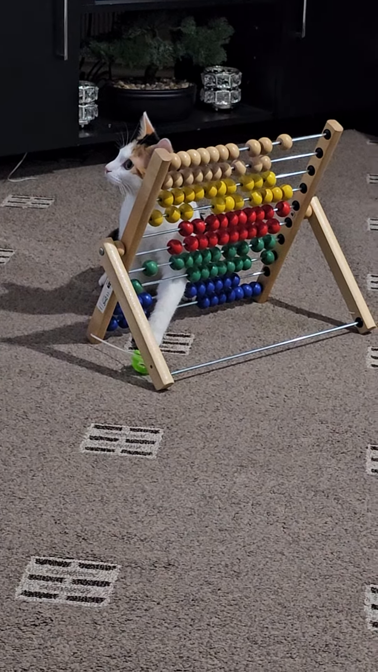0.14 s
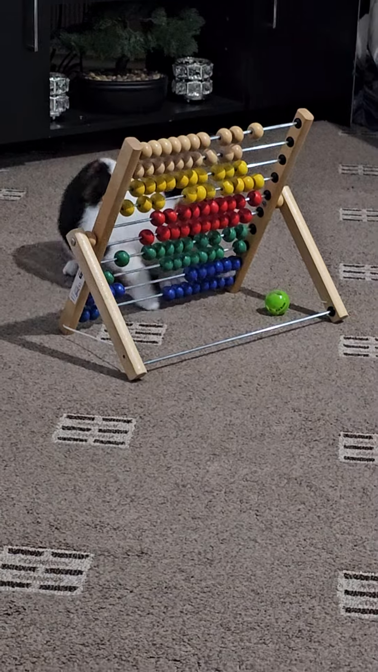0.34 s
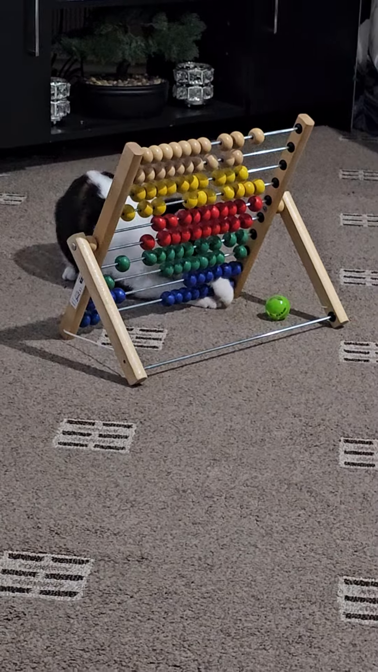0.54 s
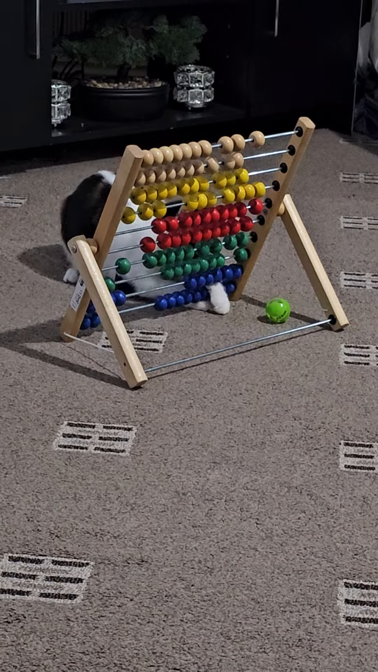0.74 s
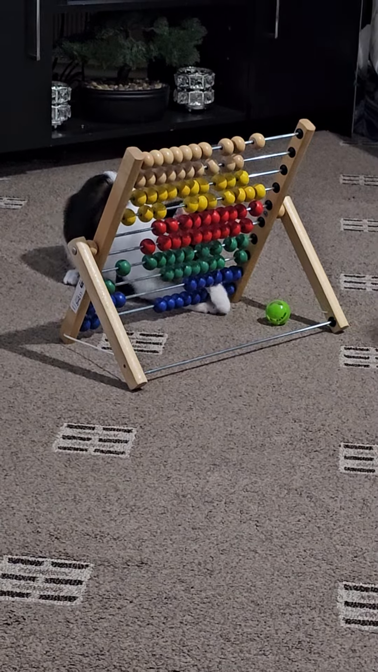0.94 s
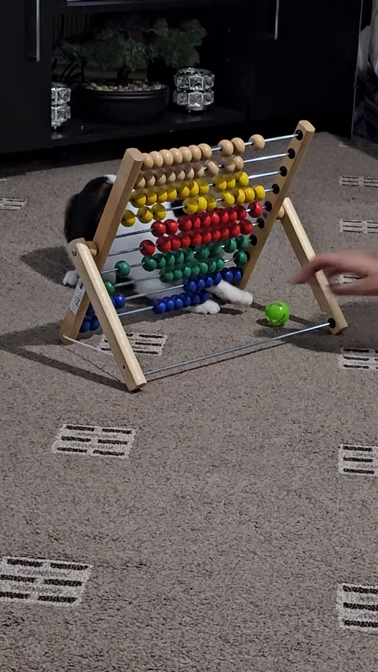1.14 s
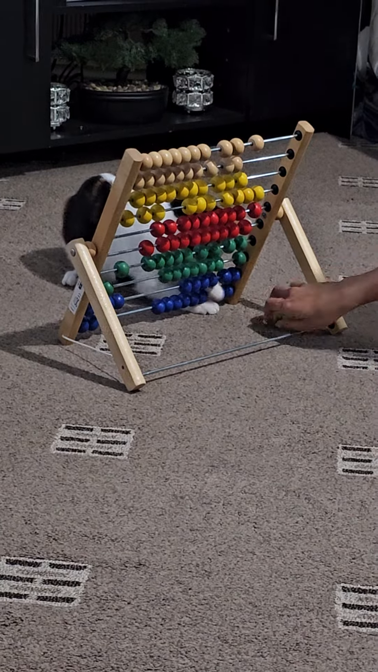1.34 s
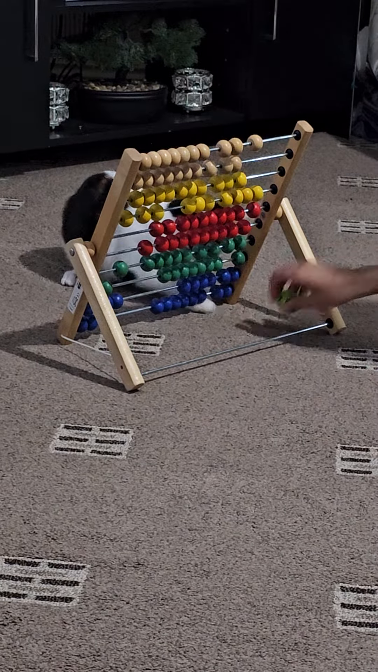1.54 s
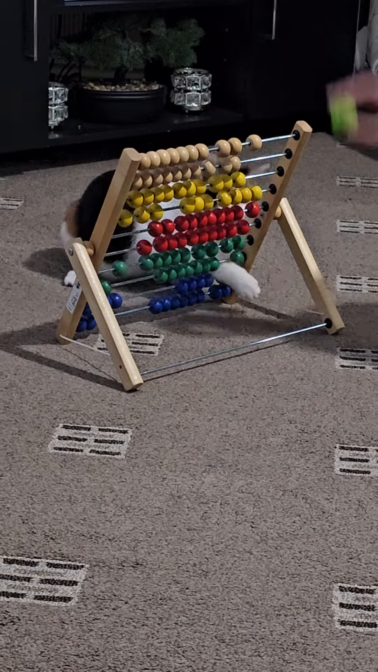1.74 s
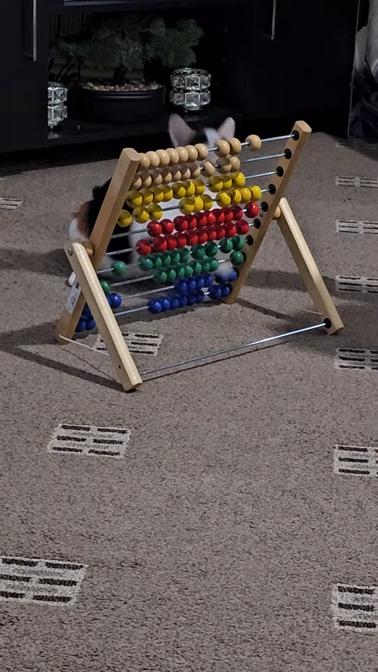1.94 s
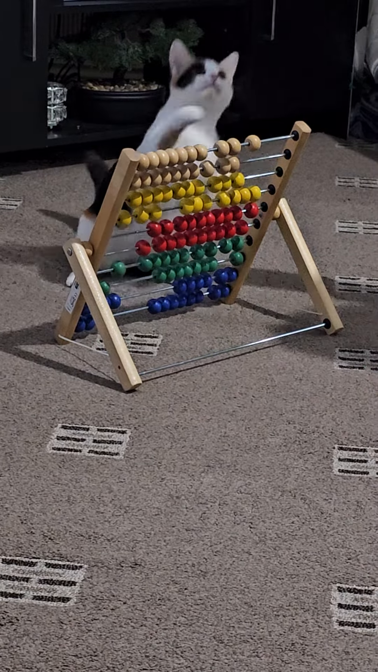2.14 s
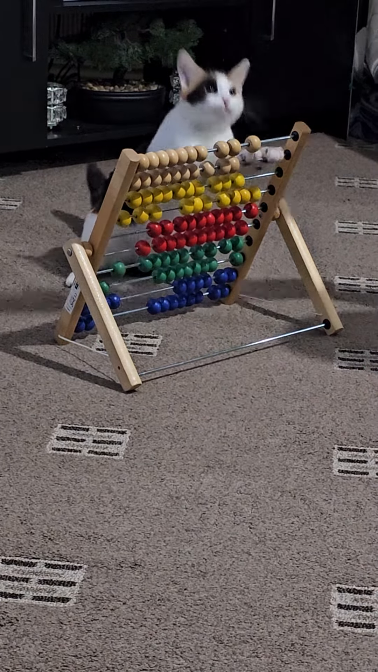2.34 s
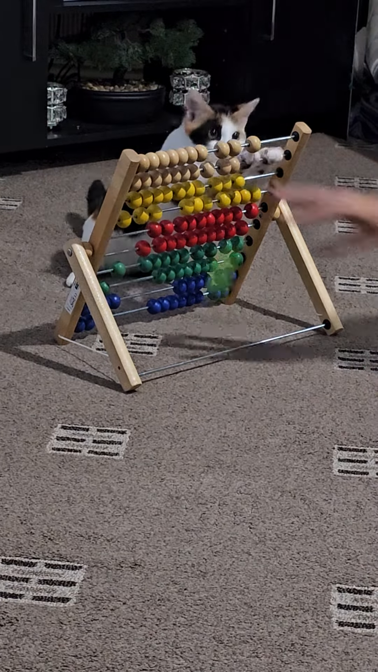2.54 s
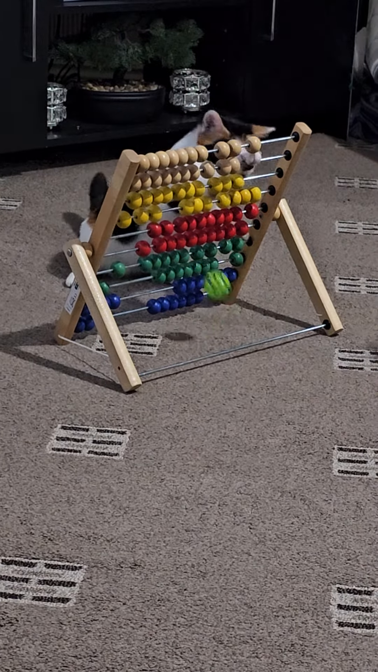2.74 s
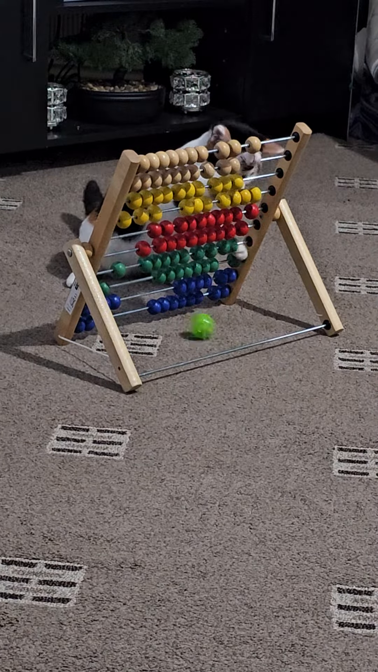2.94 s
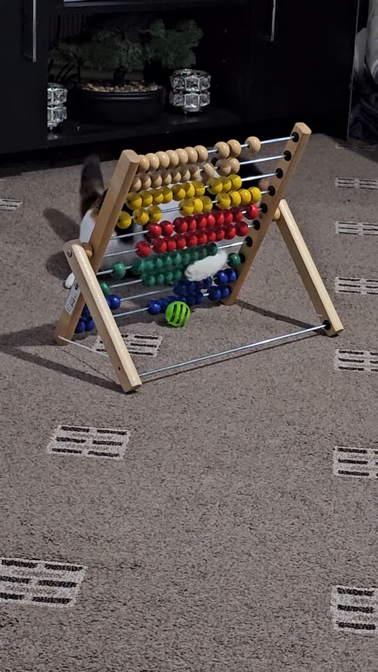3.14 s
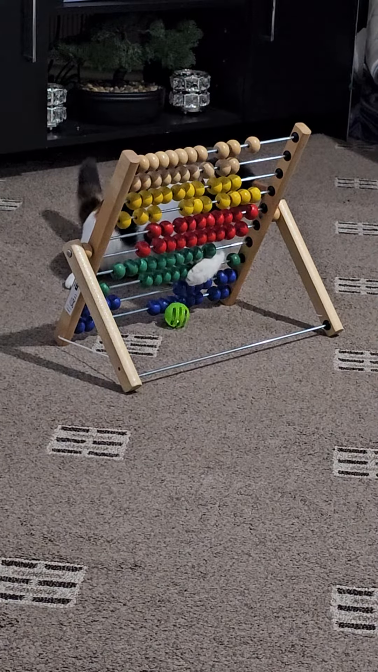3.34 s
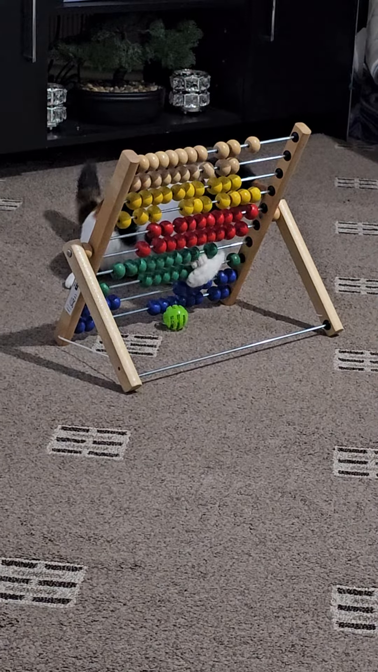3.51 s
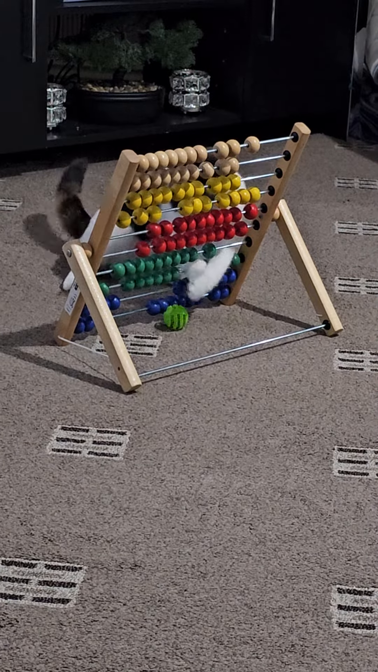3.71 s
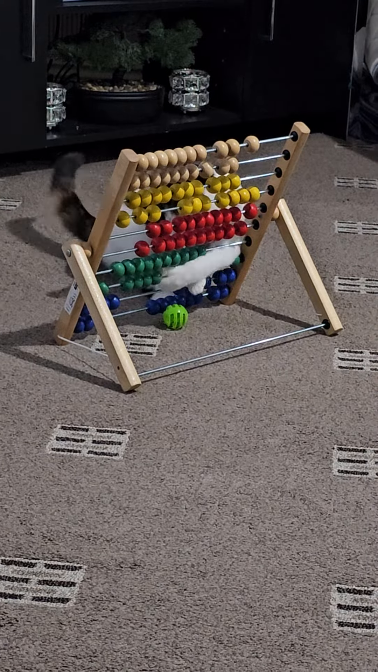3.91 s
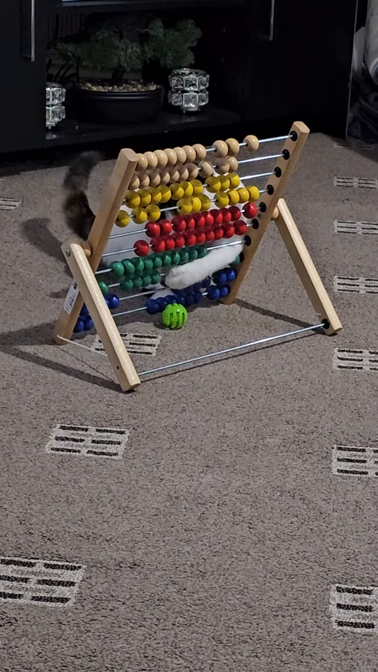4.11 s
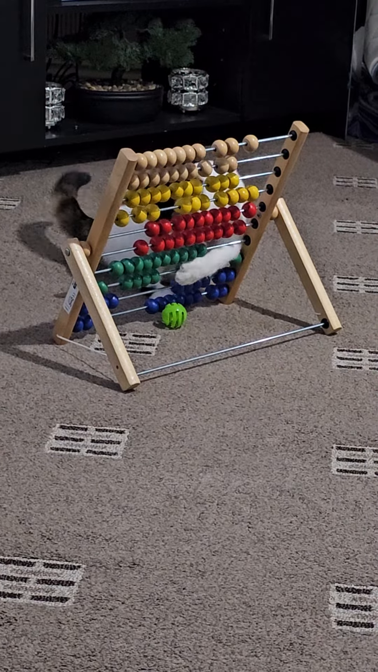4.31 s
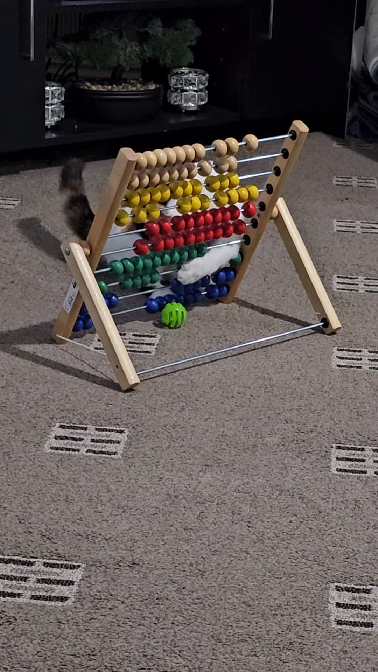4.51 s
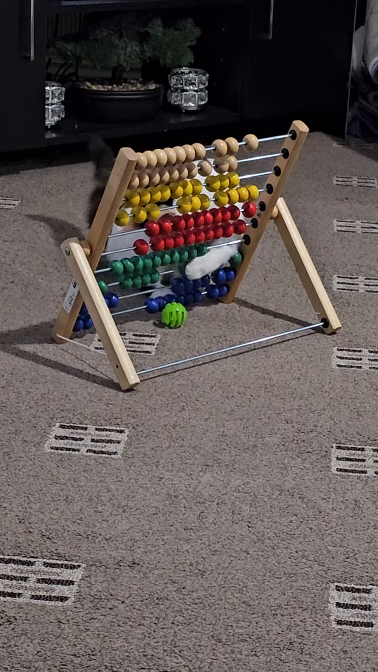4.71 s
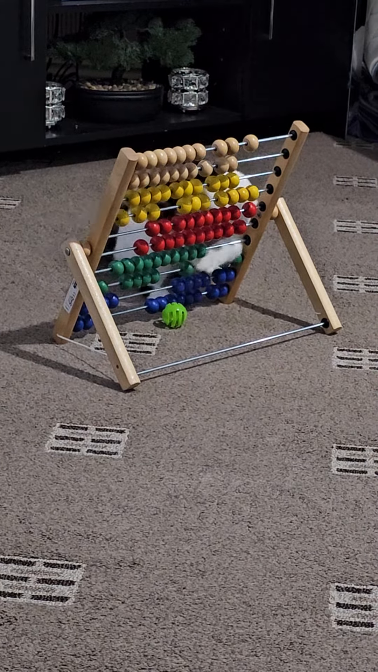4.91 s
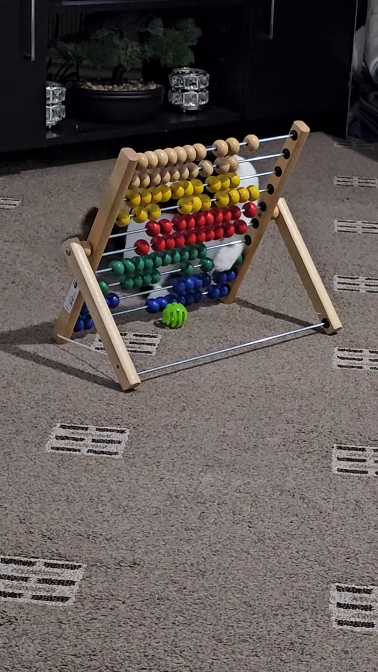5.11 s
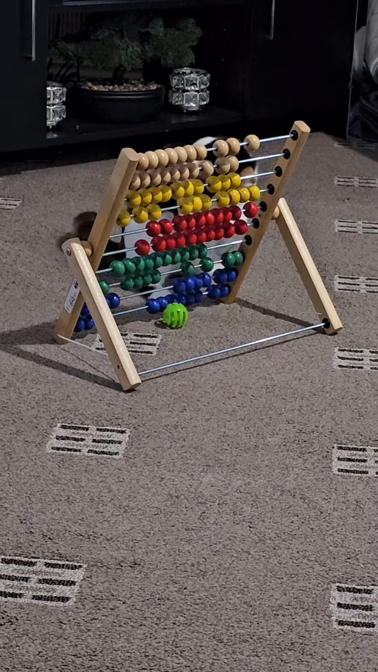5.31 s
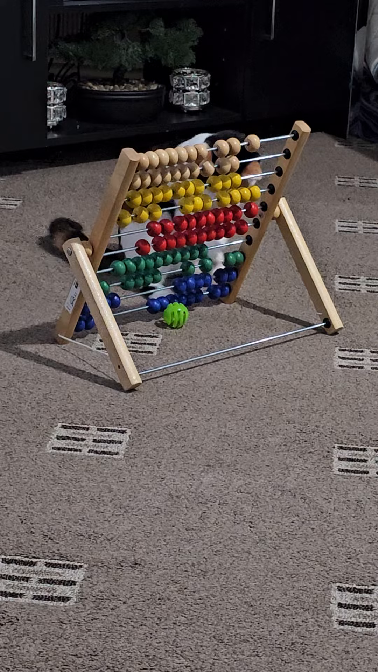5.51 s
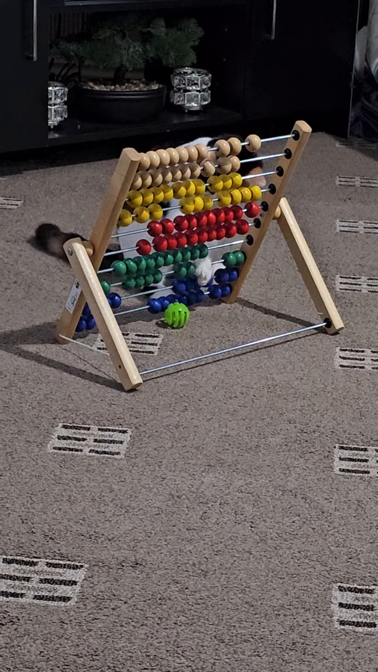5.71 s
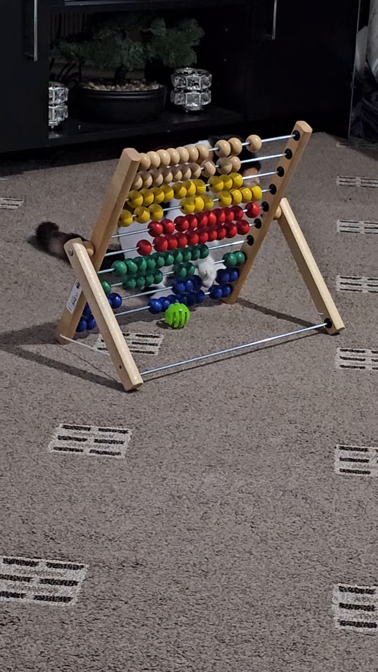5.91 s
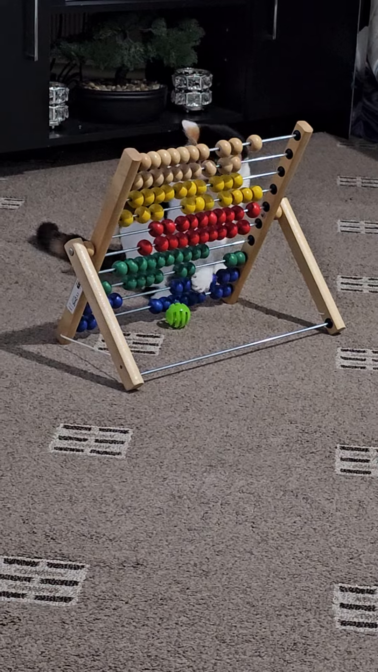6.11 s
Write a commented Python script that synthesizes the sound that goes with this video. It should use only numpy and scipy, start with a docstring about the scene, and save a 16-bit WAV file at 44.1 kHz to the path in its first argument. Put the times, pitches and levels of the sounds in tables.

```python
"""A wavering low hum and room hiss come first, with a faint airy whistle drifting on the left.
Then two kittens paw a wooden abacus on a carpet: beads clack and jostle along steel rods that ping,
and soft paws thump the frame and floor. A jingle ball is picked up, shaken and dropped, its pellet
rattling the thin shell. A phone hears it all from a metre or two away, with a short room tail."""
import sys
import numpy as np
from scipy import signal
from scipy.fft import rfft, irfft
from scipy.io import wavfile
from scipy.ndimage import uniform_filter1d

SR = 44100
rng = np.random.default_rng(int(sys.argv[2]) if len(sys.argv) > 2 else 0)


def persist_wave(psi):
    """Save psi, clipped to +-1, as 16-bit WAV."""
    counts = np.round(np.clip(psi, -1, 1) * 32767).astype(np.int16)
    wavfile.write(sys.argv[1], SR, np.atleast_2d(counts).T)


N = 271465
T = np.arange(N) / SR

# the hum's drifting pitch and swell: t/s, f/Hz, level between dips/dB
HUM_PATH = [(0, 47.9, -38), (.5, 48.1, -37.5), (.75, 50.2, -37), (.95, 50.1, -41.5), (1.25, 47.9, -34),
            (1.6, 45.93, -38), (1.85, 50.63, -37.5), (2.23, 49.34, -34), (2.7, 47.27, -38),
            (3.1, 46.1, -33), (3.3, 49.97, -39.5), (3.55, 48.28, -39.5), (4.1, 49.6, -34.5),
            (4.5, 48.44, -39), (4.85, 40.66, -48), (5.049, 49.92, -34.5), (5.701, 49.2, -36.5),
            (6.16, 43.3, -42.5)]
# brief dips in the hum: t/s, half width/s
HUM_DIPS = [(.34, 0.035), (.65, 0.045), (.72, 0.016), (.82, 0.035), (1.301, 0.094), (1.679, 0.054),
            (1.821, 0.057), (2.09, 0.097), (2.329, 0.087), (2.55, 0.14), (2.83, 0.091), (3.119, 0.073),
            (3.32, 0.045), (3.721, 0.013), (3.822, 0.034), (3.981, 0.071), (4.29, 0.091), (4.49, 0.022),
            (4.609, 0.035), (4.721, 0.029), (4.95, 0.073), (5.08, 0.084), (5.301, 0.092), (5.5, 0.045),
            (5.801, 0.085), (6.071, 0.054)]
# mains overtones: f/Hz, level/dB
MAINS_TONES = [(200, -66), (300, -75)]
# colour of the hiss: f/Hz, relative level/dB
HISS_SPECTRUM = [(15, -44), (28, -20.5), (40, -6.5), (53, -1), (65, -8.5), (97, -26), (200, -29),
                 (300, -33), (340, -40), (530, -44.5), (1020, -44.5), (1800, -54), (3000, -59), (5000, -63),
                 (8500, -73.5), (10300, -75), (11300, -62.5), (16000, -70.5)]
# slow swell of the hiss: t/s, mid-range level/dB, lower-treble lift/dB
HISS_PATH = [(0.0, -66.5, -4), (0.31, -66, -4), (0.68, -61.5, -1.5), (1.18, -65, 2.5), (1.66, -64.5, 1),
             (2.11, -64.5, 4), (2.73, -63, -3), (3.12, -57.5, -6), (3.32, -61, -3), (3.8, -62, 2.5),
             (4.759, -67, 1), (6.16, -69, 1)]
# the whistle's glide: t/s, f/Hz, level/dB
WHISTLE_PATH = [(0, 3458, -81), (0.081, 3320, -89), (0.16, 2940, -89), (.24, 2920, -84), (.33, 3470, -76),
                (.46, 3260, -74), (0.849, 3330, -78), (0.921, 2880, -87), (1.049, 3060, -75),
                (1.298, 3460, -76), (1.5, 3400, -100)]
# bead hits: t/s, peak before panning/dB, ring f/Hz, tick against wood/dB,
# jostle against peak/dB, jostle length/s
BEAD_CLACKS = [(0.328, -54, 3220, -4, -36, .044), (0.4817, -33.5, 4100, -37, -7.5, 0.02),
               (0.4945, -33, 4600, -43, -10, 0.039), (0.507, -47.5, 4370, -6, -5, 0.056),
               (0.5556, -35.5, 4500, -39, -16, 0.042), (0.658, -46, 4600, -35, -20.5, 0.17),
               (1.072, -41, 4600, -15, -7, .023), (1.096, -46.5, 4550, -26, -9, 0.047),
               (1.14, -45, 4420, -7.5, -16.5, 0.06), (1.382, -49.5, 5270, -1.5, -14, 0.087),
               (1.405, -46, 4470, -22, -18, 0.14), (1.496, -38.5, 4720, -33, -23.5, .045),
               (1.649, -48.5, 4600, 1, -13, 0.079), (1.713, -49, 4570, -17, -10.5, .081),
               (1.737, -30.5, 5500, -3, -10.5, .017), (1.751, -42.5, 4728, -16, -9, 0.11),
               (1.799, -37.5, 4890, -18, -5.5, 0.02), (1.824, -44, 4680, -15, -17, 0.057),
               (1.8843, -43, 4700, -32, -17, 0.11), (2.0427, -52.5, 3408, -22, -7.5, 0.026),
               (2.082, -52, 5230, 16, -14, 0.074), (2.146, -35, 4800, 9.5, -20.5, 0.071),
               (2.459, -41.5, 4170, -15, -15, 0.058), (2.4903, -36.5, 5430, 10.5, -19.5, .1),
               (2.5355, -36, 4340, 0, -21.5, 0.078), (2.603, -39, 4665, -4, -25, 0.031),
               (2.684, -22, 4250, 9.5, -10, 0.011), (2.6926, -21.5, 4000, -5.5, -22, 0.0095),
               (2.71, -37, 5130, -0.5, -12.5, 0.1), (2.737, -37, 4730, -5, -2, 0.019),
               (2.7465, -24.5, 3660, -29, -19, 0.057), (2.768, -34, 3640, -25, -12.5, 0.051),
               (2.88, -36.5, 4500, -11.5, -23.5, 0.074), (2.9234, -37, 4380, 4.5, -2, 0.032),
               (2.9304, -24, 5740, 10.5, -26.5, 0.14), (3.0548, -40, 5184, 2.5, -5.5, 0.036),
               (3.0721, -19, 4540, 3.5, -17, 0.062), (3.088, -20, 5560, 5.5, -17.5, 0.042),
               (3.111, -22.5, 4720, 14.5, -10, 0.019), (3.115, -27.5, 4750, 1.5, -15.5, 0.077),
               (3.1724, -35.5, 4850, -27, -8.5, 0.075), (3.198, -38.5, 4560, -29, -9, 0.055),
               (3.242, -44, 4580, -27, -8.5, 0.081), (3.612, -52.5, 3600, 3, -14, .046),
               (3.6446, -46, 4940, -18.5, -14, 0.058), (3.679, -50.5, 4830, -21, -8, 0.06),
               (3.7172, -53.5, 4460, -3, -9.5, 0.3), (3.845, -32.5, 4240, -26.5, -13, 0.061),
               (3.881, -42, 4733, -3.5, -11.5, 0.053), (3.9427, -47, 4063, -34, -10, 0.071),
               (4.0286, -47, 5700, -16, -17, .019), (4.0363, -45.5, 5500, -12, -17, 0.058),
               (4.394, -57.5, 4170, -11.5, -14, 0.063), (4.968, -45.5, 5060, -26, -14.5, 0.064),
               (5.621, -54, 4100, -21.5, -3.5, 0.017), (5.6397, -40, 4130, -33, -15.5, .042),
               (5.672, -26.5, 5565, -1, -21, 0.056), (5.695, -49, 4240, -10, -12, 0.037),
               (5.7153, -38, 4930, -13.5, -16.5, 0.021), (5.722, -46.5, 5634, -26, -18, 0.067),
               (6.0292, -59, 4600, -18, -8, 0.057)]
# resonances of a wooden bead: f/Hz, relative level/dB, t60/s
BEAD_MODES = [(2700, -5, 0.0036), (3450, -2.5, 0.016), (4320, 0, 0.016), (4880, -3.5, 0.013),
              (5870, -15.5, 0.008), (7160, -13, 0.012)]
# paws landing: t/s, peak before panning/dB, floor against frame/dB, left minus right/dB,
# contact time/s, top of the push/Hz, factor on the frame's ring time
PAW_THUMPS = [(0.716, -28, -6, -2.5, 0.013, 446, 0.29), (.741, -32.5, 2.5, 0, 0.025, 347, 0.42),
              (2.683, -14.5, -5, 1.5, 0.024, 1780, 0.52), (2.931, -35.5, 0.5, -2.5, 0.029, 1400, 0.83),
              (4.998, -30.5, 7, -2.5, 0.013, 250, 0.52), (5.717, -30.5, -33, -5.5, 0.0059, 260, 0.18)]
# resonances of the abacus frame: f/Hz, relative level/dB, undamped t60/s
FRAME_MODES = [(245, 3.5, 0.26), (292.6, 6, 0.14), (361, -6, 0.29), (417, -8.5, 0.25), (474, -12, 0.22),
               (521.6, -14.5, 0.48), (572, -25, .15), (690, -26, 0.14), (885, -24, 0.53), (969, -26, 0.36),
               (1060, -23.5, .25), (1380, -19.5, .12), (1540, -29, 0.094)]
# resonances of the floor: f/Hz, relative level/dB, t60/s
FLOOR_MODES = [(45, 7.5, 0.38), (83.3, -0.5, 0.2), (128.5, 8, 0.14), (174.7, -0.5, 0.17)]
# knocks on a steel rod: t/s, peak before panning/dB
ROD_PINGS = [(1.074, -50.5), (1.406, -57), (1.497, -50), (3.6457, -57), (4.968, -61.5)]
# resonances of a rod: f/Hz, relative level/dB, t60/s
ROD_MODES = [(4615, 6, 0.19), (7400, -14, 0.096)]
# shakes of the ball: t/s, drive level/dB, rattle t60/s
BALL_SHAKES = [(1.4, -79, 6), (1.71, -66, 1.5), (1.82, -59, 0.1), (2.07, -65, 0.5), (2.16, -66, 0.37),
               (2.472, -63, 0.47), (2.692, -45.5, 0.24), (2.74, -68, 0.5), (2.928, -59.5, 0.52),
               (3.06, -62, 0.58), (3.122, -58, 0.37), (3.53, -85, 4)]
# resonances of the bell's shell: f/Hz, relative level/dB, t60/s
BELL_MODES = [(4700, -9, .04), (5265, -2, .06), (8850, -12, .04), (11240, -6, .04), (11550, -5, .03),
              (12820, -3, .035)]

DIP_DEPTH, HISS_WANDER_DB = 0.88, 1.2  # depth: share of the hum's amplitude lost
CLACK_T60_S, JOSTLE_T60_S = 0.035, 0.0091
# frame body against the wood of a -42.5 dB clack; quieter and softer hits get a larger share
BODY_DB, BODY_PER_DB, BODY_PER_TICK_DB = -11, -0.89, -0.01
SHAKE_RISE_DB_S, BALL_RESTS_S = 503.5, 3.65
BELL_TURN_DB, PELLET_DB = 4, 14  # how unevenly the modes face the phone; gain of the dry rattle
TOY_PAN_DB = -2.5  # left minus right
ROOM_T60_S, TOY_SEND_DB, PAW_SEND_DB = .25, -10, -15
TOP_HZ = 15750


def undb(db):
    return 10 ** (np.asarray(db) / 20)


def level(x, db):
    return x * undb(db) / np.sqrt(np.mean(x ** 2))


def peak(x, db):
    return x * undb(db) / np.abs(x).max()


def pan(x, left_minus_right_db):
    return x * undb(np.array([[.5], [-.5]]) * left_minus_right_db)


def band(x, lo_hz, hi_hz):
    return signal.sosfilt(signal.butter(2, [lo_hz, hi_hz], "bandpass", fs=SR, output="sos"), x)


def add(out, at, x):
    start = int(at * SR)
    out[:, start:start + x.shape[-1]] += x[..., :N - start]


def ring(x, modes):
    """Decaying resonances (f/Hz, level/dB, t60/s) struck by x."""
    out = 0
    for hz, db, t60 in modes:
        r, w = np.exp(-np.log(1000) / (t60 * SR)), 2 * np.pi * hz / SR
        out = out + undb(db) * signal.lfilter([np.sin(w)], [1, -2 * r * np.cos(w), r * r], x)
    return out


def grains(size, per_s, spread_db):
    """Tiny random impacts of uneven strength, at unit power."""
    when, kick, strength = rng.random(size), rng.standard_normal(size), rng.exponential(size=size)
    return level((when < per_s / SR) * kick * undb(spread_db * strength), 0)


def drift(rate_hz):
    """Smooth random wander at unit power."""
    hold = int(SR / rate_hz)
    steps = np.repeat(rng.standard_normal(N // hold + 1), hold)
    return level(uniform_filter1d(uniform_filter1d(steps, hold), hold)[:N], 0)


def hum():
    """A low tone swells, drifts and dips under two faint mains overtones."""
    at, hz, db = np.transpose(HUM_PATH)
    dips = np.prod([1 - DIP_DEPTH * np.exp(-2 * ((T - s) / half) ** 2) for s, half in HUM_DIPS], axis=0)
    phase = 2 * np.pi * np.cumsum(np.interp(T, at, hz)) / SR
    tone = undb(np.interp(T, at, db) + 1.2 * drift(25)) * dips * np.sin(phase)
    mains = sum(undb(g + 2.5 * drift(2.8)) * np.sin(2 * np.pi * f * T) for f, g in MAINS_TONES)
    return np.sqrt(2) * (tone + mains)


def hiss():
    """Room air and microphone noise: narrow in the bass, wide on top, slowly swelling in the mids."""
    bins_hz = np.arange(N // 2 + 1) * SR / N + 1
    hz, colour_db = np.transpose(HISS_SPECTRUM)
    colour = undb(np.interp(np.log(bins_hz), np.log(hz), colour_db))
    width = np.clip(bins_hz / 600, .25, 1)
    mid, side = (rfft(rng.standard_normal(N)) * colour for _ in range(2))
    bed = np.array([irfft(mid + width * side, N), irfft(mid - width * side, N)])
    bed /= np.std(band(bed, 590, 2000))
    at, db, lift_db = np.transpose(HISS_PATH)
    air = band(bed, 60.9, 7000)
    sheen = (undb(np.interp(T, at, lift_db)) - 1) * band(air, 3500, 7500)
    swell = undb(np.interp(T, at, db) + HISS_WANDER_DB * drift(5.32))
    return (air + sheen) * swell + (bed - air) * undb(-68.5)


def whistle():
    """A breathy band of noise rides a gliding pitch."""
    at, hz, db = np.transpose(WHISTLE_PATH)
    phase = 2 * np.pi * np.cumsum(np.interp(T, at, hz)) / SR
    breath = drift(420) * np.sin(phase) + drift(420) * np.cos(phase)
    return breath * undb(np.interp(T, at, db))


def bead(push, ring_hz, t60, tick_db, body_db):
    """Each bead has its own modes; hard contacts tick brighter; the rod passes some to the frame."""
    quirks = rng.standard_normal((len(BEAD_MODES), 2))
    modes = [(hz * (1 + 0.089 * detune), db + 3 * boost, decay)
             for (hz, db, decay), (detune, boost) in zip(BEAD_MODES, quirks)]
    modes.append((ring_hz, -1, t60))
    top_hz = np.clip(13488.5 + 200 * tick_db, 8500, 16000)
    knock = peak(ring(push, modes), 1.5) + peak(band(push, 2800, 8800), 0)
    wood = band(knock, 1500, 0.64 * top_hz)
    tick = band(band(push, 7820, top_hz), 4800, 1.25 * top_hz)
    body = band(push, 1070, 3340)
    return peak(wood, 0) + peak(tick, tick_db) + peak(body, body_db)


def clacks():
    """A bead cracks in a brief chatter of contacts, then its neighbours jostle along the rod."""
    out, t = np.zeros((2, N)), np.arange(SR // 3) / SR
    burst = np.exp(-((t[:SR // 16] - .0015) / .0017) ** 2)
    for at, db, hz, tick_db, jostle_db, jostle_s in BEAD_CLACKS:
        body_db = BODY_DB + BODY_PER_DB * (db + 42.5) + BODY_PER_TICK_DB * tick_db
        # beads and carpet scatter the crack, so left and right share only part of it
        shared, *sides = rng.standard_normal((3, len(burst))) * burst
        crack = bead(shared + 2.6 * np.array(sides), hz, CLACK_T60_S, tick_db, body_db)
        add(out, at, peak(crack, db))
        fade = np.exp(-(t / min(jostle_s, .2)) ** 1.7) * (1 - np.exp(-t / 0.0026))
        heard = t < 3 * jostle_s
        contacts = grains((2, len(t)), per_s=1200, spread_db=0.71)[:, heard]
        jostle = bead(contacts, hz, JOSTLE_T60_S, tick_db - 6.5, body_db + 5.5)
        add(out, at, level(jostle, db + jostle_db) * fade[heard])
    return out


def paws():
    """A soft, uneven push rings the frame; the kitten's weight booms in the floor just after."""
    out, t = np.zeros((2, N)), np.arange(SR // 2) / SR
    for at, db, floor_db, pan_db, contact_s, top_hz, sustain in PAW_THUMPS:
        contact = rng.standard_normal(len(t)) * np.exp(-t / contact_s)
        push = band(contact * (1 - np.exp(-t / 0.0016)), 37, top_hz)
        # a paw that stays on the wood damps it
        frame = ring(push, [(hz, gain_db, t60 * sustain) for hz, gain_db, t60 in FRAME_MODES])
        floor = ring(push * (1 - np.exp(-t / 0.023)), FLOOR_MODES)
        thump = peak(frame, 0) + peak(floor, floor_db)
        add(out, at, pan(peak(thump, db), pan_db))
    return out


def rods():
    """A knocked steel rod rings on thinly after the wood has died."""
    out, t = np.zeros((2, N)), np.arange(SR // 4) / SR
    for at, db in ROD_PINGS:
        knock = rng.standard_normal((2, len(t))) * np.exp(-t / .012)
        add(out, at, peak(ring(knock, ROD_MODES), db))
    return out


def jingle_ball():
    """The pellet strikes the shell's modes by chance; turning shows each side another face."""
    shake = sum(undb(db + np.where(T < at, SHAKE_RISE_DB_S, -60 / t60) * (T - at))
                for at, db, t60 in BALL_SHAKES) * (T < BALL_RESTS_S)
    top_mode_rms = np.std(ring(grains(SR, per_s=300, spread_db=0), BELL_MODES[-1:]))
    shell = np.zeros((2, N))
    for side in shell:
        for mode in BELL_MODES:
            facing = undb(BELL_TURN_DB * drift(25.1))
            side += ring(shake * facing * grains(N, per_s=540, spread_db=1.8), [mode])
    rattle = band(shake * grains(N, per_s=2100, spread_db=0.92), 6000, 19000)
    return (shell + undb(PELLET_DB) * rattle) / top_mode_rms


def room(x):
    """A diffuse tail, different on each side, darkens as it dies."""
    t = np.arange(SR // 2) / SR
    noise = rng.standard_normal((2, len(t))) * (1 - np.exp(-t / 0.0022))
    warm = band(noise, 101.1, 4000)
    decay = np.exp(-np.log(1000) * t / ROOM_T60_S)
    tail = warm * decay + (noise - warm) * decay ** 5  # the band's edges die five times as fast
    tail /= np.sqrt(np.sum(tail ** 2) / 2)
    return signal.fftconvolve(x.mean(axis=0)[None], tail)[:, :N]


def scene():
    """Toys a little to the right and paws feed the room, over a dry bed of hum, hiss and whistle."""
    toys = pan(clacks() + jingle_ball() + rods(), TOY_PAN_DB)
    thumps = paws()
    reverb = undb(TOY_SEND_DB) * room(toys) + undb(PAW_SEND_DB) * room(thumps)
    bed = pan(hum(), 0.8) + hiss() + pan(whistle(), 5)
    return toys + thumps + reverb + bed


def record(dry):
    """The phone cuts the top off steeply."""
    return signal.sosfilt(signal.ellip(10, .2, 60, TOP_HZ, fs=SR, output="sos"), dry)


dry = scene()
out = record(dry)
persist_wave(out)
```